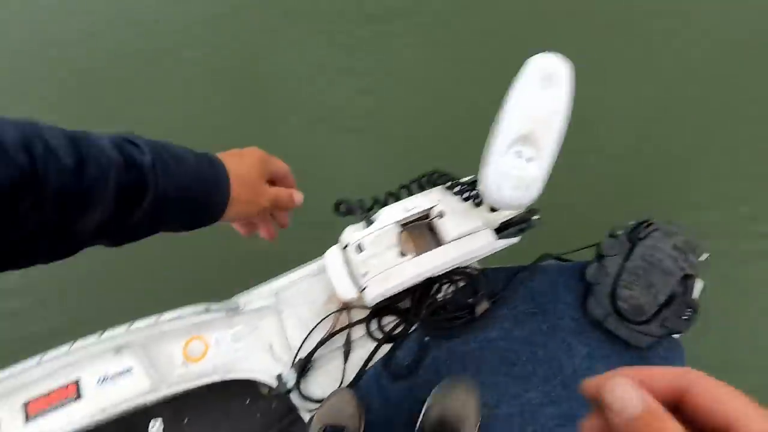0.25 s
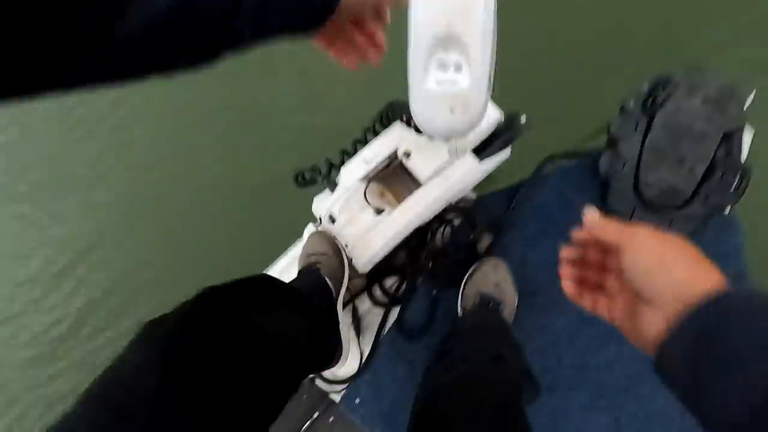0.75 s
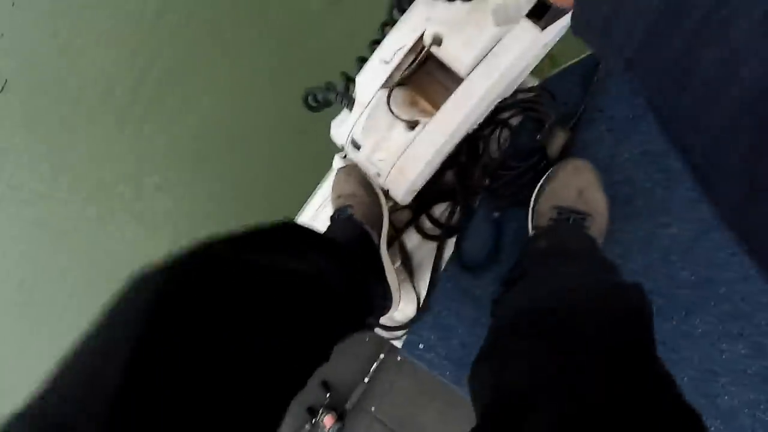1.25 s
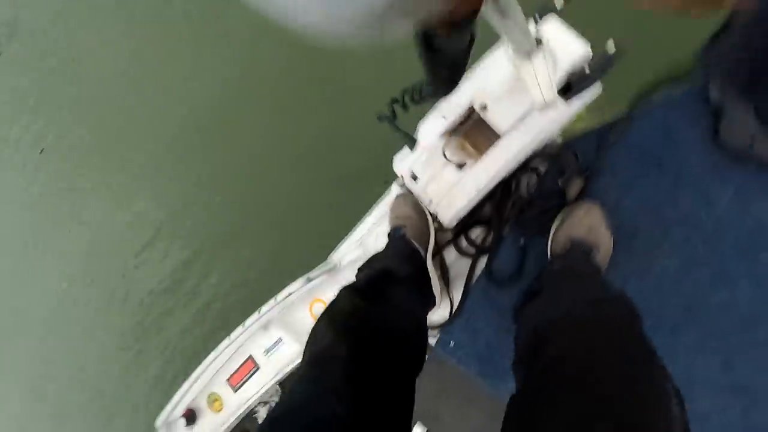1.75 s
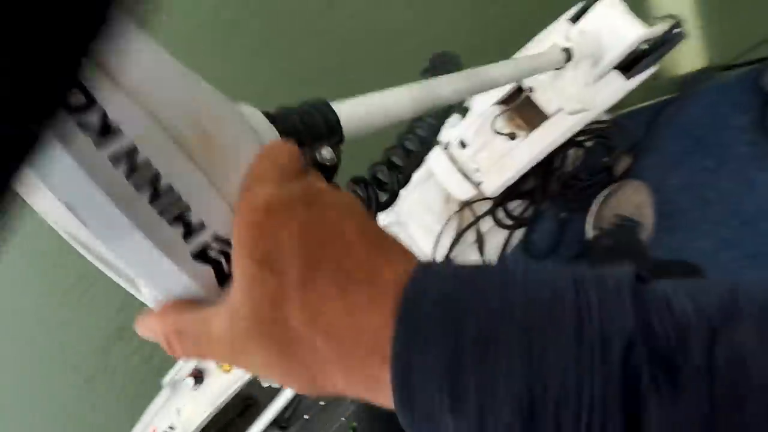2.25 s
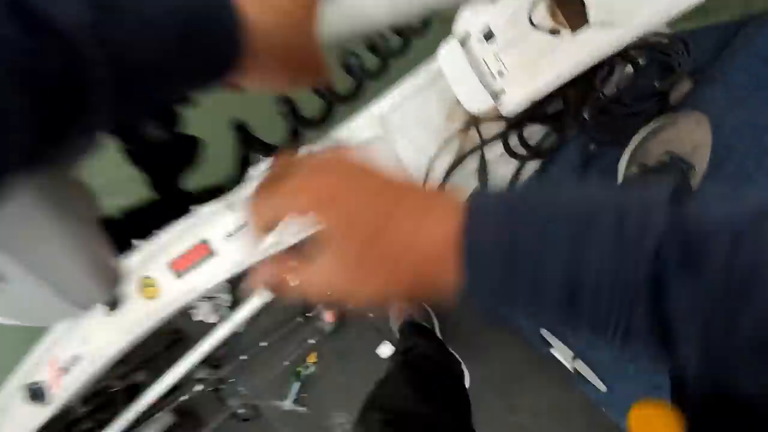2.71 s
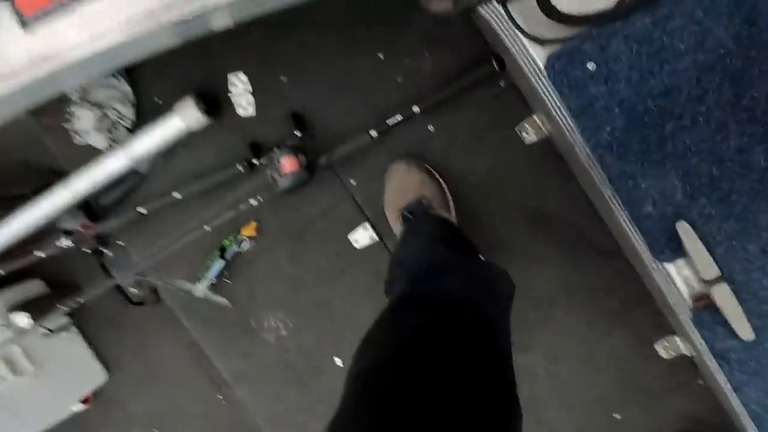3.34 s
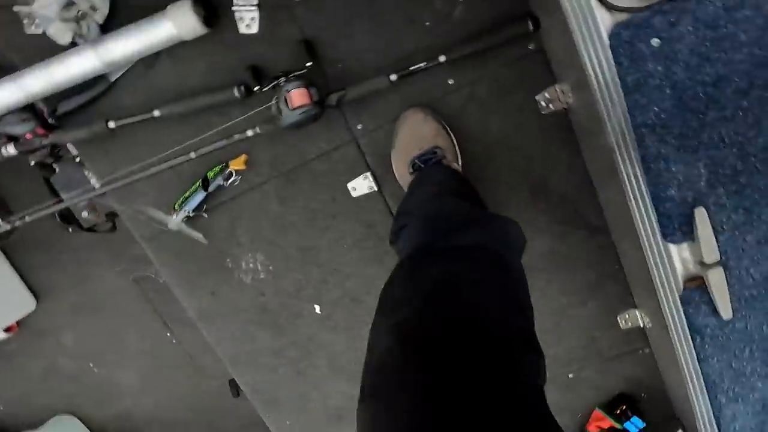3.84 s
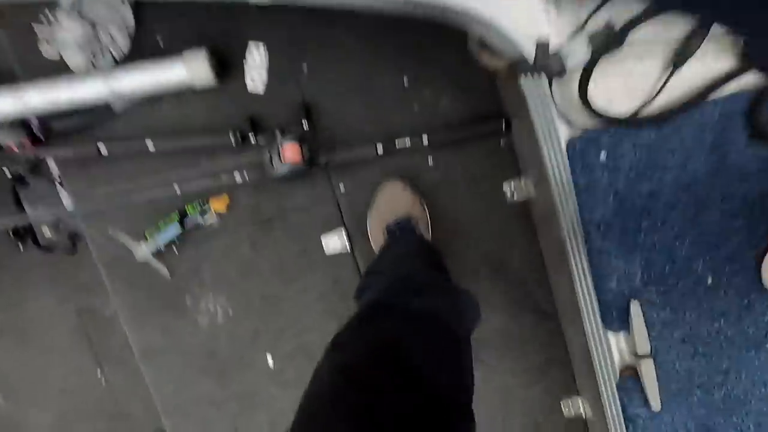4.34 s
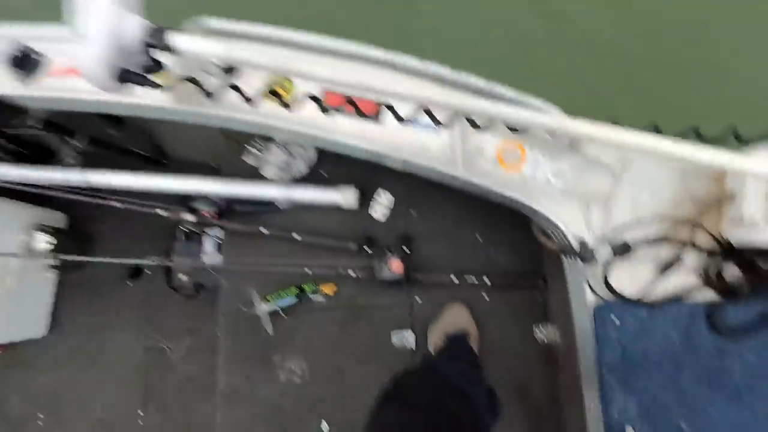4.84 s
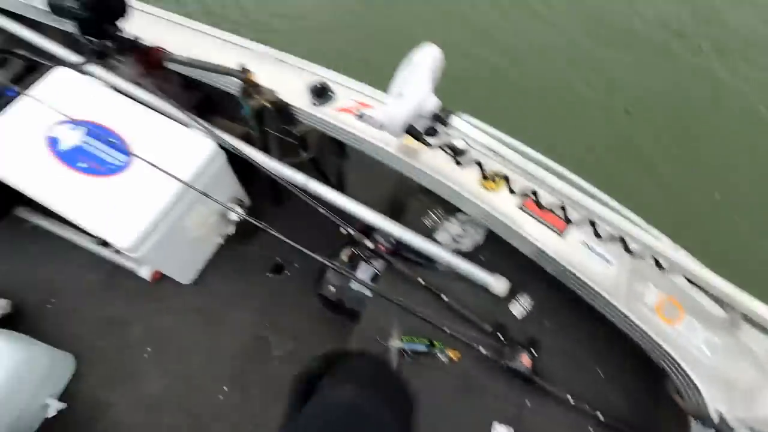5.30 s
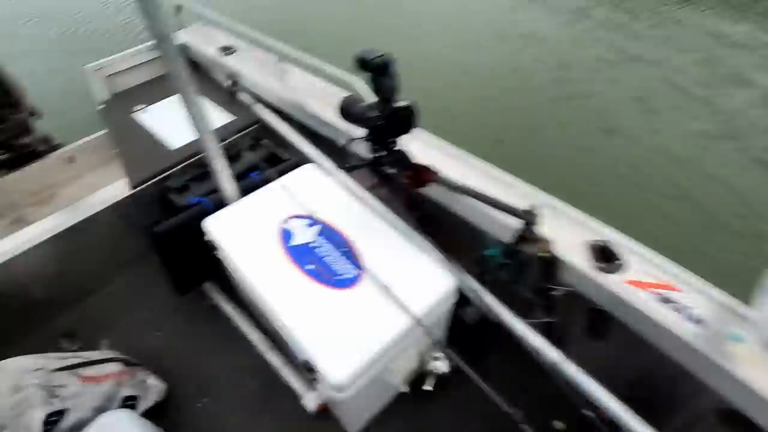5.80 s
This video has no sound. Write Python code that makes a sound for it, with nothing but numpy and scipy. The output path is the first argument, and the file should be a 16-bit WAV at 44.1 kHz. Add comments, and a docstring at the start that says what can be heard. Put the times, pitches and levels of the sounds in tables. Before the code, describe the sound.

Hollow aluminium boat deck knocks and booms under footsteps while a motor's fittings click, squeak and clunk into place, cloth rustling close to the microphone.

```python
"""Bow of an aluminium boat: a person folds an electric motor into its mount and steps about the deck.
Background: air on a body-worn microphone, hull creaks and clothing rustle as shaped noise;
a low hum, one sine, runs until the motor is lifted. Fittings squeak as blurred gliding tones
and click as noise bursts with a rough ring. Steps thud as low sines; knocks boom as sums of plate modes."""
import sys
import numpy as np
from scipy import signal
from scipy.fft import rfft, irfft, next_fast_len
from scipy.io import wavfile
from scipy.ndimage import uniform_filter1d, map_coordinates

SR = 44100
rng = np.random.default_rng(int(sys.argv[2]) if len(sys.argv) > 2 else 0)


def unload_audio(sound):
    """Save the sound as a 16-bit wav file, at the path given as the first command line argument."""
    columns = np.transpose(np.atleast_2d(sound))
    # keep every value between -1 and 1, then stretch to whole-number steps
    steps = np.round(np.clip(columns, -1, 1) * 32767)
    wavfile.write(sys.argv[1], SR, steps.astype(np.int16))


N = 267188
T = np.arange(N) / SR

# air on the microphone, before fluctuation: t/s, level/dB
AIR_LEVEL = [(0.0, -43.5), (2.14, -50.5), (2.33, -42), (3.16, -45), (3.32, -38), (3.9, -49), (4.34, -39.5),
             (5.65, -55), (6.06, -37)]
# air noise colour: f/Hz, relative gain/dB
AIR_SPECTRUM = [(12, -36), (20, 0.5), (43, 5.5), (130, -7.5), (157, -7.5), (200, -10.5), (260, -47),
                (440, -120)]
# movement, before fluctuation: t/s, hull murmur level/dB, rustle level/dB, rustle treble gain/dB
MOVEMENT_LEVELS = [(0, -47.5, -50, -40), (.16, -48, -47.5, -56.5), (.26, -40, -36.5, -42.5),
                   (.41, -45, -48, -41), (.5, -43, -45, -51.5), (.64, -40.5, -40, -46.5),
                   (.75, -44, -46.5, -47), (.86, -48, -48, -50.5), (1.38, -43.5, -47, -52),
                   (1.65, -29, -41, -43.5), (1.9, -43, -45, -47), (2.12, -42, -49, -57.5),
                   (2.3, -28, -44.5, -54), (2.41, -36, -49, -51), (2.6, -40, -47.5, -56),
                   (2.9, -50, -46.5, -50), (3.12, -41, -44, -48.5), (3.44, -41.5, -44, -44.5),
                   (3.85, -39, -45.5, -44.5), (4.15, -44.5, -47.5, -50), (4.4, -29, -37, -45),
                   (4.55, -36.5, -52.5, -57), (4.91, -52.5, -50.5, -56), (5.18, -42.5, -48, -51),
                   (5.5, -49.5, -55, -59), (5.68, -46.5, -48, -53), (5.84, -50, -53, -54.5),
                   (5.96, -46, -45.5, -49.5), (6.06, -44, -48.5, -54.5)]
# hull murmur colour: f/Hz, relative gain/dB
MURMUR_SPECTRUM = [(59, -30), (100, -4), (233, 3), (267, -3), (431, -1.5), (563, -7), (612, -13),
                   (696, -20), (900, -42.5), (1170, -47), (1980, -120)]
# fabric noise colour: f/Hz, relative gain/dB
CLOTH_SPECTRUM = [(350, -14.5), (600, 2.5), (1010, -2.5), (1360, -3), (1670, -7), (1810, -7.5), (2370, -10),
                  (4150, -9.5), (5530, -15.5), (6870, -16.5), (8550, -25), (10100, -28.5), (11100, -37),
                  (12300, -31), (15600, -54)]
# rubbing parts: t/s, length/s, first f/Hz, last f/Hz, rms level before taper/dB
SQUEAKS = [(0.607, 0.025, 9480, 9400, -54), (1.389, 0.016, 9800, 9650, -46),
           (1.415, 0.021, 3920, 3760, -31), (1.436, 0.04, 3850, 3490, -32),
           (1.865, .015, 3830, 3840, -39.5), (1.868, .014, 7170, 7200, -43.5),
           (2.603, 0.033, 4400, 4600, -48), (2.657, 0.072, 4550, 4440, -45.5),
           (2.735, 0.034, 4500, 4500, -51), (4.244, .05, 1444, 1830, -35)]
# hard contacts of latch, shaft and fittings:
# t/s, nominal peak level/dB, ring f/Hz, upper-middle gain/dB, treble gain/dB, nominal t60/s
CLICKS = [(0.1859, -22, 1304, -32.5, -49, 0.034), (0.2764, -33, 1560, -11, -4, 0.25),
          (0.401, -23, 1940, -14.5, -6, 0.044), (0.4277, -29.5, 2994, -1, 0.5, .018),
          (0.4819, -20.5, 1060, -19, -49, 0.029), (0.5991, -26, 855, -11.5, -11, 0.047),
          (0.637, -18, 1186, -25, -32, 0.02), (0.7747, -15, 1390, -14, -33, 0.011),
          (0.9062, -14.5, 1170, -13, -17, 0.1), (0.9176, -7, 1938, -14, -19, 0.03),
          (.9383, -23.5, 1006, -14, -27, .099), (1.274, -20.5, 1195, -10.5, -22, 0.042),
          (1.3956, -14, 940, -12, -14, 0.034), (1.4065, -9.5, 957, -9, -11, 0.048),
          (1.4565, -12.5, 1375, -11.5, -23, 0.073), (1.4649, -15, 1050, -17, -21, 0.044),
          (1.6004, -16, 1076, -19, -29, 0.042), (1.6478, -18, 1040, -15, -21, 0.03),
          (1.684, -22.5, 1047, -11.5, -22, 0.069), (1.7454, -30.5, 1070, -7, -7, 0.081),
          (1.7936, -35, 1075, 2, -25, .057), (1.8706, -35, 1910, -4, -20, .04),
          (2.126, -26, 1109, -25.5, -28, 0.037), (2.152, -23.5, 1310, -16, -25, 0.07),
          (2.1672, -25.5, 880, -7, -14, 0.05), (2.1765, -17, 1134, 0.5, -7.5, 0.062),
          (2.2054, -3.5, 1125, -14, -29, 0.051), (2.2274, -19.5, 1196, -14.5, -23, 0.13),
          (2.269, -30, 1170, -11, -9.5, 0.058), (2.3117, -30, 1070, -12, -31, .04),
          (2.355, -22, 1094, -15, -41, 0.063), (2.3686, -25, 1750, -4.5, -18, 0.028),
          (2.3884, -31, 1443, -7, -20, 0.048), (2.4172, -29, 1510, -18, -39, .035),
          (2.481, -14.5, 4150, -13, -16, 0.032), (2.4947, -25, 929, -15, -34, 0.075),
          (2.7238, -15, 934, -17.5, -38, 0.072), (2.735, -33.5, 1190, -9.5, -25, .12),
          (2.7672, -30.5, 1180, -6, -11, 0.039), (2.7931, -21.5, 857, -23, -50, 0.072),
          (2.8566, -25.5, 1810, -25, -30, 0.031), (2.9444, -26, 1397, -29, -15, 0.063),
          (3.07, -25.5, 1285, -15.5, -18, 0.096), (3.1512, -26, 1124, -11.5, -27.5, 0.086),
          (3.2024, -24.5, 1090, -14, -23.5, 0.024), (3.4074, -26, 1180, -17, -24, 0.043),
          (3.642, -16, 900, -20, -48, 0.024), (3.6663, -19, 910, -22, -34, 0.039),
          (3.7199, -26, 1440, -16, -30, 0.044), (4.166, -18, 1227, -20, -28, 0.13),
          (4.1846, -6, 1306, -13, -15.5, 0.036), (4.198, -20.5, 1090, -15, -16, 0.057),
          (4.2744, -10, 1883, -10, -25.5, 0.072), (4.3063, -15, 1288, -13, -8, 0.11),
          (4.32, -8.5, 3810, -12, -5, 0.069), (4.3334, -22.5, 1200, -6, -2, 0.066),
          (4.3834, -13.5, 1790, -8.5, -6.5, 0.072), (4.3996, -16, 1260, -30, -24, 0.049),
          (4.423, -23, 1395, -4.5, -0.5, 0.075), (4.4396, -15.5, 1203, -22, -31, 0.064),
          (4.461, -35.5, 1143, 1, -2, 0.031), (5.1134, -28, 970, -16.5, -27, 0.09),
          (5.1535, -29, 995, -32, -40, 0.06)]
# crack noise colour: f/Hz, relative gain/dB
CRACK_SPECTRUM = [(410, -27.5), (700, -2), (829, -8.5), (1160, 0.5), (1470, -6), (2110, -5), (3730, -6),
                  (6360, -18), (6960, -18.5), (8130, -24.5), (10300, -39.5), (13300, -46), (15600, -50)]
# crack gain before the colour of each contact: one gain/dB each for body, upper middle, treble, top
CRACK_BANDS_DB = [-1, 8, 15.5, 18]
# resonances of the mount: f/Hz, width/Hz
MOUNT_MODES = [(1020, 66.2), (1210, 64), (1500, 71), (1890, 76), (2300, 73), (3100, 320), (3650, 100),
               (4090, 78), (4900, 78), (6900, 100), (7550, 840)]
# weight landing on the deck: t/s, nominal peak level/dB
THUDS = [(0.547, -16.5), (0.6, -24.5), (0.683, -23.5), (1.388, -26), (1.43, -22.5), (1.467, -19),
         (2.351, -26.5), (2.741, -20), (2.759, -15), (3.316, -26.5), (3.412, -34), (4.309, -25),
         (4.322, -11), (4.339, -12), (4.374, -26), (5.095, -10), (5.113, -24), (5.88, -24), (5.895, -14),
         (5.915, -26), (5.938, -36)]
# blows into the hull: t/s, nominal peak level/dB, ring centre f/Hz, t60 at 300 Hz/s, focus/(dB per octave)
KNOCKS = [(.188, -26.5, 640, 0.19, 9), (.524, -6, 185, 0.072, 19), (0.548, -24, 181, 0.14, 16),
          (.6, -20, 175, 0.069, 3), (0.641, -16, 89, 0.058, 13), (0.683, -25, 93, 0.097, 0),
          (0.911, -9.5, 335, 0.023, 4), (.921, -7, 480, 0.12, 4.5), (.941, -7, 237, 0.17, 9),
          (.952, -24, 147, 0.12, -4), (.98, -22, 143, 0.057, 11), (1.124, -21.5, 135, 0.13, 2.5),
          (1.286, -20, 463, 0.052, 40), (1.395, -0.5, 472, 0.055, 10), (1.412, -4.5, 447, 0.08, 4),
          (1.429, -9, 242, 0.11, 5), (1.466, -6.5, 423, 0.07, 9), (1.484, -7.5, 182, 0.081, 5),
          (1.51, -17, 156, 0.14, 16.5), (1.595, -8.5, 427, 0.091, 4.5), (1.645, -8.5, 419, 0.071, 8),
          (1.683, -8.5, 386, 0.091, 6), (1.743, -10, 393, 0.053, 13), (1.79, -11.5, 383, 0.1, 3),
          (2.174, -12.5, 442, 0.19, 1.5), (2.204, -7, 427, 0.14, 7), (2.233, -14.5, 500, 0.18, 15),
          (2.259, -10.5, 190, .145, 5), (2.351, -10, 281, 0.12, 2.5), (2.384, -19, 298, 0.12, 13),
          (2.479, -12, 439, 0.12, 3), (2.612, -18.5, 210, 0.13, 5), (2.647, -18, 397, 0.14, 21),
          (2.699, -18, 272, 0.28, 3), (2.725, -5.5, 241, 0.16, 3.5), (2.741, -9, 349, 0.14, 27),
          (2.76, -14.5, 180, 0.16, 8), (2.798, -11.5, 440, 0.062, 8), (2.826, -20.5, 139, 0.041, 0),
          (2.86, -21, 193, 0.046, 9), (3.009, -24.5, 428, 0.037, 13), (3.079, -25, 429, 0.066, 11),
          (3.162, -18.5, 158, 0.14, 6), (3.32, -27.5, 390, 0.07, 22), (3.35, -25.5, 130, 0.08, 8),
          (3.413, -22, 120, 0.13, 2), (3.639, -3, 332, 0.12, 21), (3.641, -17, 850, 0.1, 30),
          (3.664, -14, 356, 0.057, -4), (3.698, -16, 350, 0.29, 39), (3.729, -16, 89, 0.091, 10),
          (3.942, -23, 603, 0.13, 8), (4.026, -25.5, 405, 0.091, 23), (3.859, -25, 430, 0.084, 23),
          (4.165, -8.5, 295, 0.32, 7), (4.185, -3, 348, 0.18, 4), (4.221, -19.5, 158, 0.18, 17),
          (4.28, -9.5, 452, 0.12, 19), (4.293, -9.5, 364, 0.15, 14), (4.307, -2.5, 291, 0.38, 11.5),
          (4.321, 1, 208, .053, 8), (4.339, -3.5, 264, .156, 9), (4.373, -11, 197, 0.2, 26),
          (4.394, -5, 417, 0.076, 24), (4.428, -10, 186, 0.08, 5), (4.462, -16, 276, 0.024, 11),
          (4.551, -22.5, 368, 0.188, 22.5), (5.097, -13, 95, 0.083, 10), (5.098, -19.5, 230, 0.061, 4.5),
          (5.53, -27.5, 107, 0.043, 6), (5.772, -30.5, 150, .083, 10), (5.879, -9, 117, 0.085, 6.5),
          (5.893, -15.5, 79, 0.1, 12), (5.916, -11, 61, 0.13, 5.5), (5.975, -21, 102, 0.036, 14),
          (6.037, -23, 379, 0.097, 6)]
# plate modes of the hull: nominal f/Hz, relative level/dB
PLATE_MODES = [(48, -7.5), (62, -4.5), (78, 2), (95, -1.5), (115, -4.5), (135, -3), (158, 4.5), (180, 0),
               (200, -1.5), (225, -2), (260, -2), (290, -2), (318, -4), (352, 1), (385, -2.5), (420, -2),
               (460, 2), (505, -1.5), (560, -6.5), (620, -5.5), (690, -5), (835, -5), (915, -12.5)]

HUM_HZ, HUM_DB, HUM_END_S, HUM_FADE_S = 146.6, -40, 1.38, 0.02
CLICK_RISE_MS, CLICK_CREST_DB = 2.3, 8.5  # crest: peak over rms
CRACK_STEEP = 1130  # steepness of the swell of the noise burst; lower is gentler
TOP_SHARE = 0.8  # how far the top follows the treble
TOP_SLOPE = 0.5  # how far the top carries on the slope from upper middle to treble
THUD_HZ, THUD_RISE_MS, THUD_T60_S = 70, 10.7, 0.12
KNOCK_RISE_MS, KNOCK_CREST_DB = 5.49, 11
PANELS_DB, PANELS_TILT_DB_PER_OCT = -18.5, 3.5  # least share of the small panels; tilt about 400 Hz
LIMIT_PEAK, TOP_HZ = 0.72, 15719


def amp(db):
    """Gain of a dB value."""
    return 10 ** (np.asarray(db) / 20)


def unit(x):
    """x at rms 1."""
    return x / np.sqrt(np.mean(x ** 2) + 1e-20)


def coloured(x, points):
    """x filtered by (f/Hz, gain/dB) points, interpolated on a log axis."""
    m = next_fast_len(x.shape[-1] + 8192)
    f, db = np.transpose(points)
    gain = amp(np.interp(np.log(np.fft.rfftfreq(m, 1 / SR) + 1), np.log(f + 1), db))
    return irfft(rfft(x, m) * gain, m)[..., :x.shape[-1]]


def wobble(rate_hz):
    """Smooth random curve, rate_hz knots a second."""
    return map_coordinates(rng.standard_normal(int(N * rate_hz / SR) + 4), [T * rate_hz])


def add(track, start_s, sound):
    """Mixes a sound in at start_s."""
    part = track[round(start_s * SR):][:len(sound)]
    part += sound[:len(part)]


def split(x, edge_hz):
    """The parts of x below and above an edge."""
    low = signal.sosfiltfilt(signal.butter(4, edge_hz, fs=SR, output="sos"), x)
    return low, x - low


def contact(t, rise_ms, t60_s, steep=3500):
    """Envelope of a contact: exponential swell until about rise_ms, then exponential decay."""
    late_s = t - rise_ms / 1000
    swell = np.exp(np.minimum(-steep * late_s / rise_ms, 50))
    return 1 / (swell + amp(60 * late_s / t60_s))


def resonant(x, modes, share):
    """x with the bands around (f/Hz, width/Hz) resonances lifted."""
    f = np.fft.rfftfreq(len(x), 1 / SR)
    lift = sum(1 / (1 + (2 * (f - hz) / width_hz) ** 2) for hz, width_hz in modes)
    return irfft(rfft(x) * (1 + share * lift), len(x))


def grainy(spectrum, rate_hz, spread_db, share):
    """Coloured noise with sparse impulses of unequal size in it."""
    sign = rng.choice([-1, 1], N)
    ticks = (rng.random(N) < rate_hz / SR) * sign * amp(spread_db * rng.random(N))
    return unit(coloured(rng.standard_normal(N) + share * unit(ticks), spectrum))


def grains(count, pitch_hz, cycles, spread_db):
    """Tiny damped rings of random pitch and size, as threads and grit let go."""
    where, tune, size = rng.random((count, 3)).T
    hz = (pitch_hz * 2.0 ** (2.0 * (tune - 0.5)))[:, None]
    t = np.arange(600) / SR
    level_db = spread_db * size[:, None] ** 2 - 60 * t * hz / (2 * cycles)
    rings = amp(level_db) * np.sin(2 * np.pi * hz * t)
    index = (where * N).astype(int)[:, None] + np.arange(len(t))
    return unit(np.bincount(index.ravel(), rings.ravel(), minlength=N)[:N])


def patchy(x, depth_db):
    """x with bands some hundred Hz wide swelling and fading on their own."""
    z = signal.stft(x, nperseg=512)[2]
    field = uniform_filter1d(rng.standard_normal(z.shape), size=7, axis=0)
    field = uniform_filter1d(field, size=16, axis=1)
    return signal.istft(z * amp(depth_db * unit(field)), nperseg=512)[1][:len(x)]


def air():
    """Air moving at the microphone: low noise with random gusts at two rates."""
    level_db = np.interp(T, *np.transpose(AIR_LEVEL))
    gust_db = 5.0 * wobble(12.0) + 2 * wobble(3.22)
    return amp(level_db + gust_db) * unit(coloured(rng.standard_normal(N), AIR_SPECTRUM))


def hull_creaks():
    """Weight shifts creak through the hull: grainy low noise of unsteady level."""
    t_s, hull_db, _, _ = np.transpose(MOVEMENT_LEVELS)
    level_db = np.interp(T, t_s, hull_db) + 2.5 * wobble(30)
    return amp(level_db) * grainy(MURMUR_SPECTRUM, 90, spread_db=8, share=0.58)


def rustle():
    """Fabric rubs: grainy noise split at 3040 Hz, damped grains added to the low part, the high part patchy."""
    t_s, _, cloth_db, treble_db = np.transpose(MOVEMENT_LEVELS)
    low, high = split(grainy(CLOTH_SPECTRUM, 300, spread_db=31.5, share=0.254), 3040.0)
    low = unit(low) + 0.38 * grains(count=1500, pitch_hz=1300.0, cycles=3.4, spread_db=31.5)
    low_db = np.interp(T, t_s, cloth_db) + 1.4 * wobble(25)
    high_db = np.interp(T, t_s, treble_db) + 1.2 * wobble(18)
    return amp(low_db) * low + amp(high_db) * patchy(high, depth_db=2.5)


def hum():
    """One steady low tone that wavers a little and stops when the motor is lifted."""
    on = 1 / (1 + np.exp(np.clip((T - HUM_END_S) / HUM_FADE_S, -50, 50)))
    level = amp(HUM_DB + 1.1 * wobble(2.6))
    return on * level * np.sin(2 * np.pi * HUM_HZ * T + 0.3 * wobble(9.9))


def squeaks():
    """Stick-slip tones: a gliding line blurred by a narrow band of noise."""
    out = np.zeros(N)
    for start_s, length_s, first_hz, last_hz, db in SQUEAKS:
        count = int(length_s * SR)
        noise = rng.standard_normal((2, count + 200))
        a, b = unit(uniform_filter1d(noise, size=110, axis=1)[:, 100:-100])
        phase = 2 * np.pi * np.cumsum(np.linspace(first_hz, last_hz, count)) / SR
        tone = unit((a + 1.3) * np.sin(phase) + b * np.cos(phase))
        add(out, start_s, amp(db) * tone * np.hanning(count) ** 0.58)
    return out


def crack_bands():
    """Crack noise in four bands, each chattering as the contact breaks and closes again."""
    grit = coloured(rng.standard_normal(next_fast_len(N + SR)), CRACK_SPECTRUM)
    low, high = split(unit(resonant(grit, MOUNT_MODES, share=0.34)), 6060)
    body, upper_middle = split(low, 1990.0)
    treble, top = split(high, 13000)
    knots = np.arange(len(grit)) * 400 / SR  # 400 a second
    curves = rng.standard_normal((4, 4000))
    chatter = [amp(4.5 * np.interp(knots, np.arange(4000), row)) for row in curves]
    return np.multiply(chatter, [body, upper_middle, treble, top])


def clicks():
    """A grainy burst of crack noise, its treble gone first, with a short rough ring of the part struck."""
    out, t = np.zeros(N), np.arange(-SR // 50, SR // 7) / SR
    bands = crack_bands()
    lasting = np.array([[1.3], [1.05], [0.85], [0.6]])  # share of t60 per band
    lateness = np.array([[0.8], [1.1], [1.3], [1.4]])  # share of rise per band: higher bands peak slightly later
    for start_s, db, ring_hz, middle_db, treble_db, t60_s in CLICKS:
        burst = bands[:, round(start_s * SR):][:, :len(t)]
        burst = burst * contact(t, CLICK_RISE_MS * lateness, t60_s * lasting, CRACK_STEEP)
        top_db = TOP_SHARE * treble_db + TOP_SLOPE * (treble_db - middle_db)
        crack = amp(np.add(CRACK_BANDS_DB, [0, middle_db, treble_db, top_db])) @ burst
        roughness = np.cumsum(rng.normal(0, 0.043, len(t)))  # rad
        ring = 0.74 * np.sin(2 * np.pi * ring_hz * t + roughness)
        ring *= contact(t, CLICK_RISE_MS, 1.1496 * t60_s)
        add(out, start_s + t[0], amp(db - CLICK_CREST_DB) * (crack + ring))
    return out


def thuds():
    """Landing weight pushes the whole hull: one low sine, its pitch a little different each time."""
    out, t = np.zeros(N), np.arange(SR // 3) / SR
    for start_s, db in THUDS:
        push_hz = THUD_HZ * np.exp(0.196 * rng.standard_normal())
        push = np.sin(2 * np.pi * push_hz * t) * contact(t, THUD_RISE_MS, THUD_T60_S)
        add(out, start_s, amp(db) * push)
    return out


def knocks():
    """Each blow rings the plate modes, favouring those near its centre pitch."""
    out, t = np.zeros(N), np.arange(SR // 3) / SR
    hz, mode_db = np.transpose(PLATE_MODES)[:, :, None]
    for start_s, db, centre_hz, t60_s, focus_db in KNOCKS:
        near_db = -focus_db * np.abs(np.log2(hz / centre_hz))  # the spot struck favours nearby modes
        panels_db = PANELS_DB + PANELS_TILT_DB_PER_OCT * np.log2(centre_hz / 400)
        large_db = near_db - 6 * np.maximum(np.log2(centre_hz / hz) - 1, 0)  # largest plates hardly move
        near_db = np.where(hz > 750, np.maximum(near_db, panels_db), large_db)
        detune, turn, luck = rng.standard_normal((3, len(PLATE_MODES), 1))
        phase = 2 * np.pi * hz * (1 + 0.0254 * detune) * (t - KNOCK_RISE_MS / 1000) + 1.29 * turn
        life_s = t60_s * (300 / hz) ** 0.3  # higher modes die sooner
        fade = contact(t, KNOCK_RISE_MS, life_s)
        fade = fade + 0.074 * contact(t, KNOCK_RISE_MS, 4 * life_s)  # the far hull rings on
        ring = np.sum(amp(mode_db + near_db + 3 * luck) * fade * np.sin(phase), 0)
        add(out, start_s, amp(db - KNOCK_CREST_DB) * ring / np.std(ring[:SR // 60]))
    return out


def scene():
    """All sources at one microphone."""
    background = air() + hull_creaks() + rustle() + hum()
    return (background + squeaks() + clicks() + thuds() + knocks())[None]


def record(dry):
    """Rounds off the loudest peaks, then drops everything above the band limit."""
    soft = dry / (1 + np.abs(dry / LIMIT_PEAK) ** 6) ** (1 / 6)
    m = next_fast_len(N + 8192)
    passband = np.fft.rfftfreq(m, 1 / SR) < TOP_HZ
    return irfft(rfft(soft, m) * passband, m)[:, :N]


dry = scene()
out = record(dry)
unload_audio(out)
```